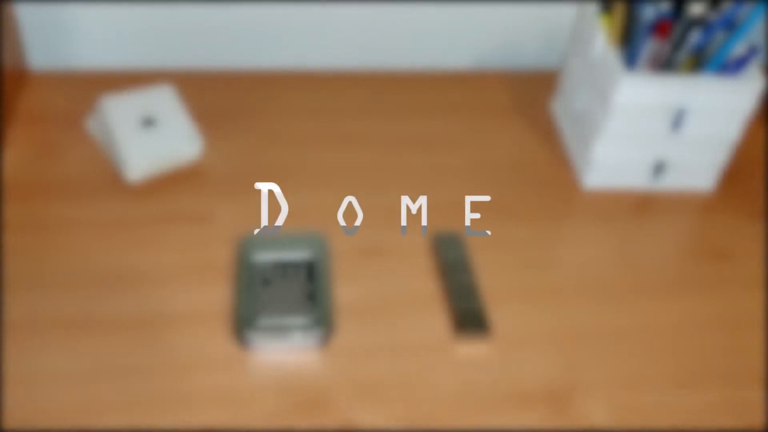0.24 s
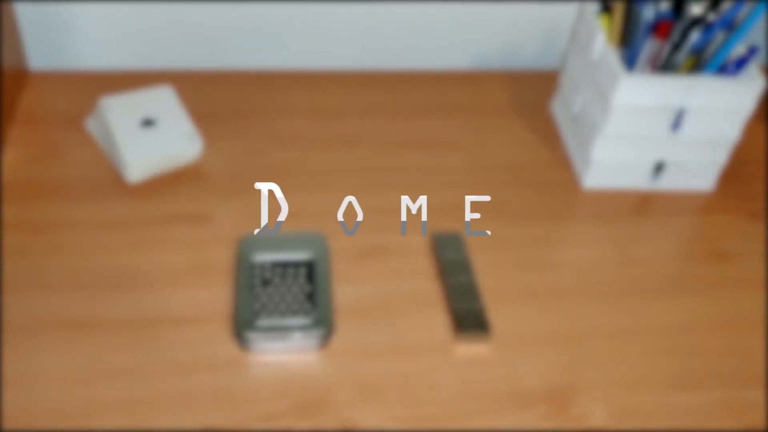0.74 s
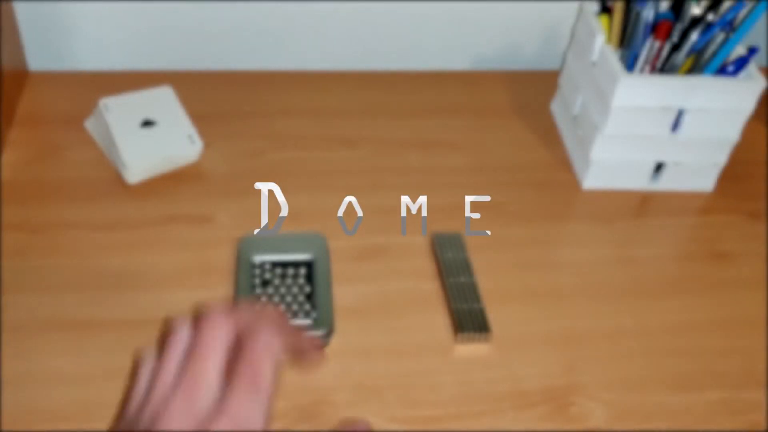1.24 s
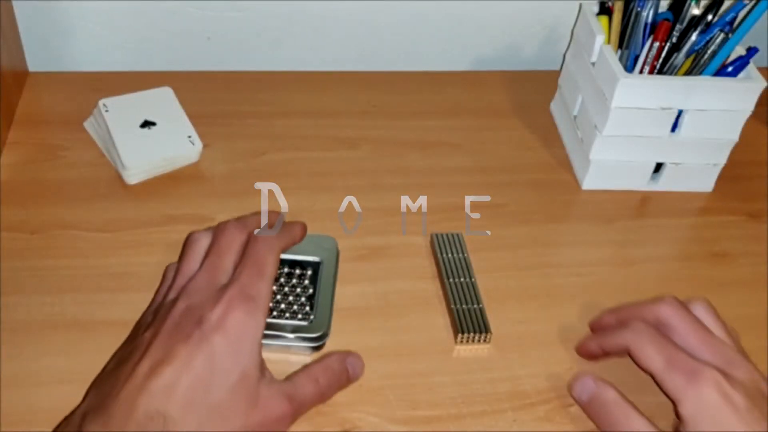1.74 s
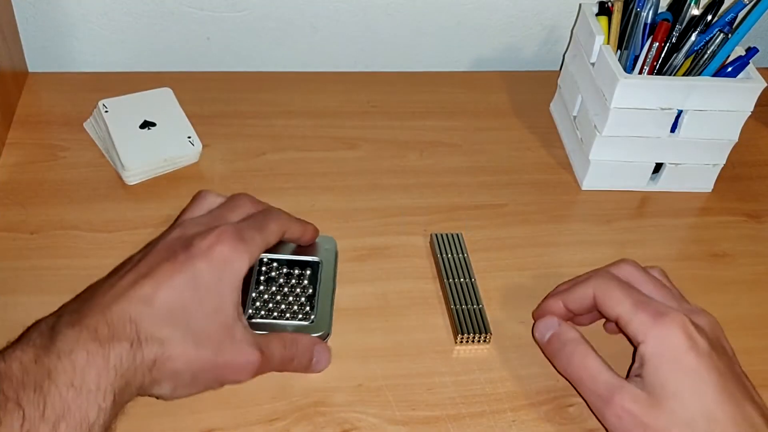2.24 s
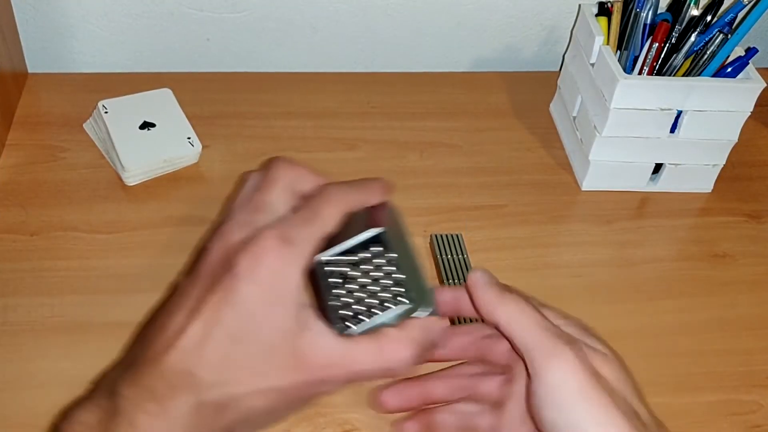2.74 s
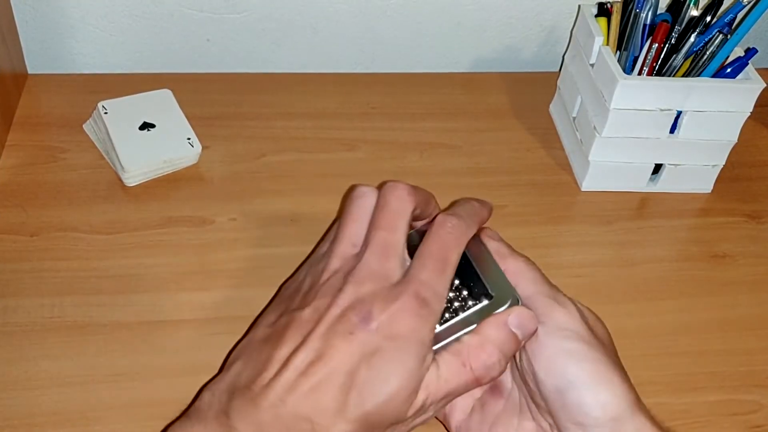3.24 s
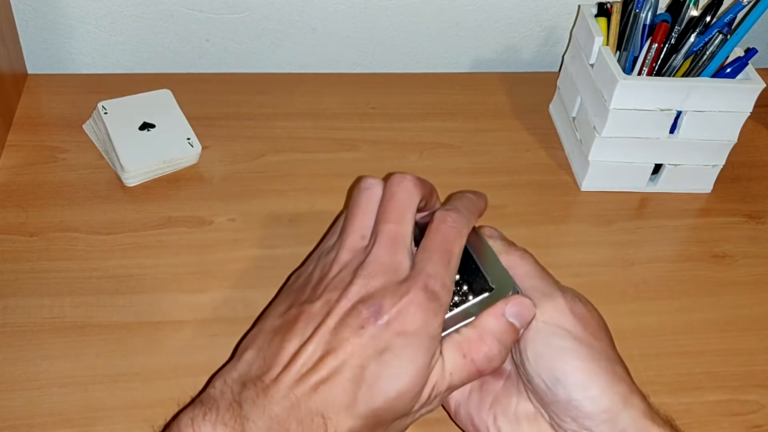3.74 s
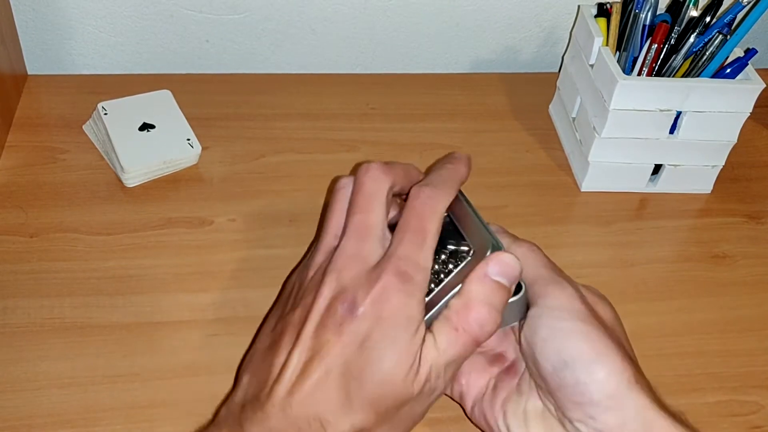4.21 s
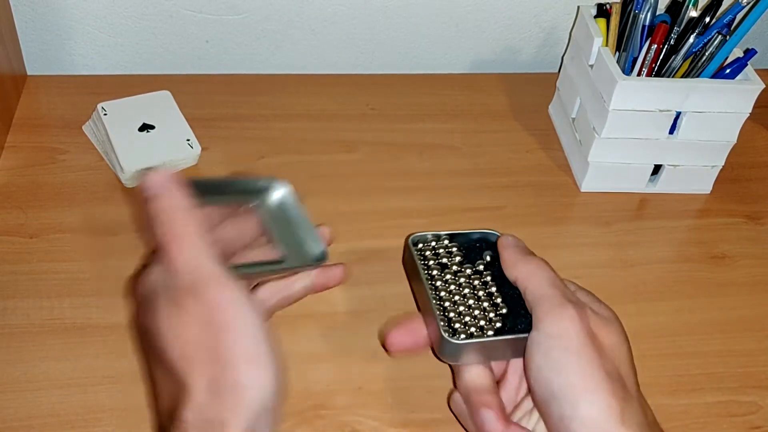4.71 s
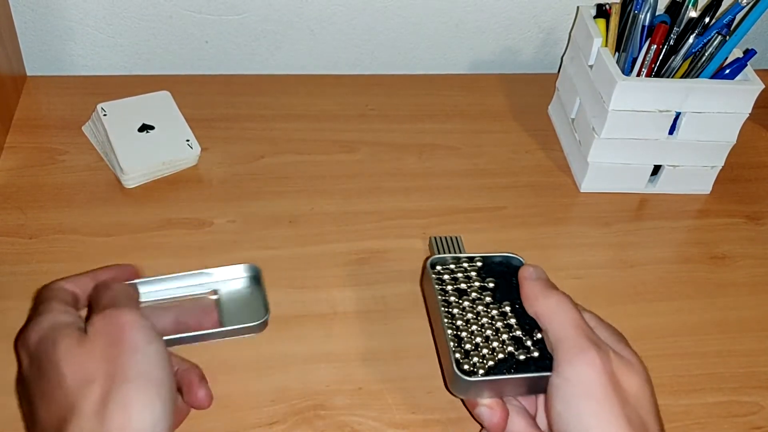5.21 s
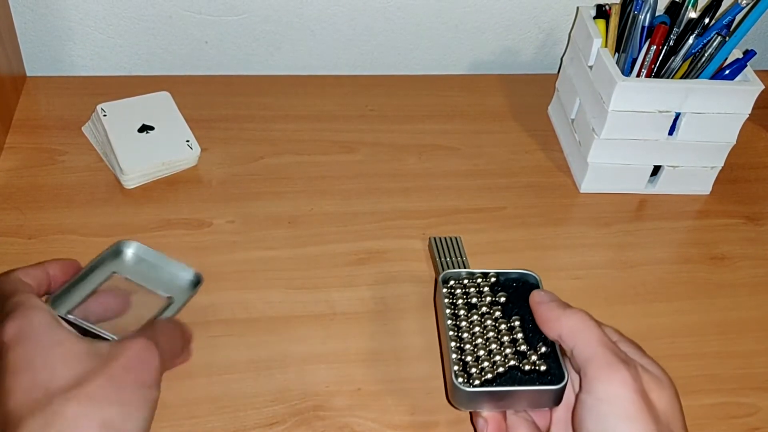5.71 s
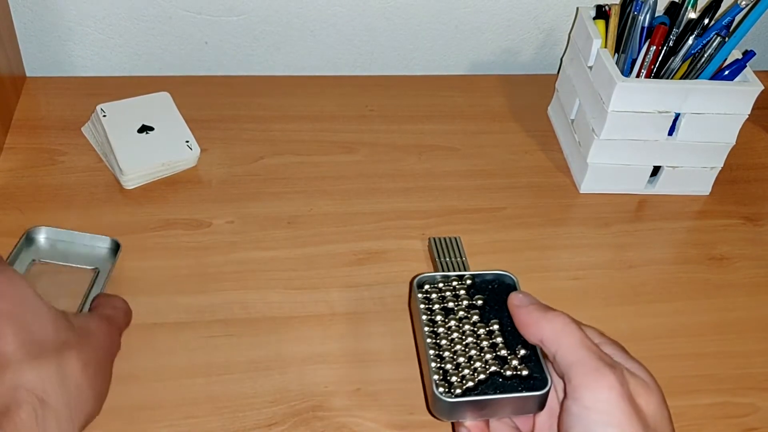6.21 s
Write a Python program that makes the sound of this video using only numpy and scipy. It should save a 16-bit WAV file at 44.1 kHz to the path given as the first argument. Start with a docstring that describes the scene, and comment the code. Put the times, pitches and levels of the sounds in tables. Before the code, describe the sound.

A small tin of steel balls scrapes across a wooden desk, rattles, pops open, then its loose lid clinks and clacks down with a skid.

```python
"""Steel balls in a tin.

A small tin of magnetic steel balls is slid off a wooden desk, lifted and prised open: the balls rattle,
the lid pops, scrapes free, clinks in the hand, is set down with a sharp clack and skids.
Knocks are contacts with dying chatter and rubs are trains of tiny slips, both mostly ringing damped modes;
the pop is one damped swing of air. A small room with a faint low hum, at a close pair of microphone ports."""
import sys
import numpy as np
from scipy import signal
from scipy.io import wavfile
from scipy.ndimage import uniform_filter1d

SR = 44100
rng = np.random.default_rng(int(sys.argv[2]) if len(sys.argv) > 2 else 0)


def put_to_file(sound):
    """Save the sound as 16-bit audio at rate SR, in the file named by the first command-line argument."""
    columns = np.atleast_2d(sound).T  # one column per channel
    safe = np.clip(columns, -1, 1)
    whole_steps = np.round(safe * 32767)
    wavfile.write(sys.argv[1], SR, whole_steps.astype(np.int16))


N = 284886
TIME = np.arange(N) / SR

# Levels of tin, lid and hands are ahead of the ports, those of knocks, drags and skids also ahead of a trim.
# hum tones of the room: f/Hz, level/dB
HUM_TONES = [(49.1, -54.5), (72.0, -61.5), (113.7, -61.5)]
# rises of the lowest hum tone: t/s, level/dB
LOW_HUM_SWELL = [(.5, -4.5), (.8, 0), (4.3, 0), (4.8, 3.5)]
# room rumble, alike at both ports: f/Hz, level/dB
RUMBLE_COLOUR = [(20, -5), (45, 4.5), (90, -11.5), (125, -5), (170, -16), (300, -18.5), (500, -24),
                 (900, -38.5), (2000, -34)]
# each port's own hiss: f/Hz, level/dB
HISS_COLOUR = [(40, 25.5), (100, 22), (200, 9), (500, 7.5), (1000, 5), (2500, 0.5), (6300, 1.5),
               (8000, -1.5), (10000, -29), (12000, -28), (15500, -9)]

# low rustle of the hands and rumble of the desk: f/Hz, level/dB
RUSTLE_COLOUR = [(60, -15.5), (150, -2), (280, 0), (500, -10), (1200, -15.5), (3000, -21), (7000, -30),
                 (10000, -72)]
# low rustle of gripping hands, and the desk's rumble under the dragged tin:
# start t/s, swell t/s, fall t/s, peak level/dB
RUSTLE_SWELLS = [(1.8, 0.1, 0.44, -57), (2.5, 0.1, 0.24, -62.5), (3.58, .35, 0.92, -57.5),
                 (4.62, 0.16, 1, -59.5)]

# the tin ringing against the desk as it slides: f/Hz, width/Hz, level/dB
SLIDING_TIN_MODES = [(537, 99, -2), (924, 134, 1), (1100, 123, 4.5), (1314, 180, -0.5), (1700, 480, -9.5),
                     (2500, 770, -11.5), (3340, 1340, -17), (5700, 1900, -22)]
# pulls of the tin over the desk: start t/s, swell t/s, fall t/s, peak level/dB
DRAGS = [(1.763, 0.059, 0.071, -42), (2.213, 0.014, 0.073, -57.5), (2.368, 0.27, .14, -45.5)]
# the tin's edge bumps on the desk as it is tipped up: t/s, level/dB
BUMPS = [(1.909, -50), (2.699, -35.5), (2.729, -37), (2.807, -37.5)]
# pitch of the scrape as the tin is tipped on its edge: t/s, pitch factor
TIPPING_PITCH = [(0, 0.99), (2.38, 1.14), (2.62, .94), (2.9, 0.91)]

# the bare click of steel on steel: f/Hz, level/dB
CLICK_COLOUR = [(100, -21.5), (350, -29), (650, -36), (1000, -11), (3000, -19.5), (6000, -13.5),
                (8500, -18), (12000, -19), (15500, -2)]
# resonances of the shut tin: f/Hz, width/Hz, level/dB
SHUT_TIN_MODES = [(486, 28, -5.5), (587, 45, -6), (937, 65, 6.5), (1119, 66, 5.5), (1400, 38, -1),
                  (1534, 50.6, -2), (1767, 63, 0), (2630, 240, -7), (3670, 95, -11), (3920, 87, -7),
                  (4820, 63, -13), (6330, 75, -7.5), (6710, 91, -15), (8030, 210, -11)]
# knocks of the balls in the shut tin: t/s, treble level/dB, body level/dB
SHUT_KNOCKS = [(1.917, -31.5, -47.5), (2.598, -36, -41.5), (2.6304, -37, -37.5), (2.659, -33, -41.5),
               (2.7004, -27.5, -34), (2.7294, -30, -35), (2.807, -26.5, -76), (2.9477, -24.5, -28),
               (2.9568, -16.5, -33.5), (2.9928, -14.5, -25.5), (3.0024, -17, -34.5), (3.0228, -21, -32),
               (3.034, -24, -24.5), (3.051, -14.5, -25), (3.0744, -16.5, -30), (3.0885, -25, -23.5),
               (3.1003, -16.5, -38), (3.1257, -22.5, -29.5), (3.1708, -24.5, -41), (3.2056, -26, -56),
               (3.3519, -37.5, -49.5)]
# the balls roll over as the tin is lifted, then settle: start t/s, swell t/s, fall t/s, peak level/dB
SHUFFLES = [(3.025, 0.059, 0.049, -24.5), (3.2, .04, 0.46, -55.5)]

# the puff of air as the lid pops: f/Hz, level/dB
POP_COLOUR = [(40, -30), (90, -18), (145, 1), (200, 0), (270, 3), (370, 0), (470, -4), (620, -13),
              (900, -16.5), (2000, -49)]
# resonances of the rim: f/Hz, width/Hz, level/dB
RIM_MODES = [(435, 174, 9), (726, 31, -12.5), (888, 48, 16.5), (1230, 150, 7.5), (1290, 160, 0),
             (1870, 240, 1), (2950, 350, -21), (4100, 93, -9), (6000, 140, -24), (8200, 350, 3.5)]
# the rim snaps over its catch: t/s, treble level/dB, body level/dB
RIM_KNOCKS = [(3.9808, -14.5, -19), (3.987, -10.5, -24.5), (3.9925, -19, -30)]
# resonances of the opening tin: f/Hz, width/Hz, level/dB
OPEN_TIN_MODES = [(950, 36, -2), (1350, 80, 2), (1650, 130, -6.5), (1960, 120, -2), (2740, 82, -6.5),
                  (3910, 130, -7), (4580, 190, -9.5), (5000, 91, -9.5), (5200, 64, -18), (5430, 90, -8),
                  (6320, 100, -4), (7250, 120, -13), (8050, 174, -8.5), (8980, 130, -10)]
# lid rim and balls against the opening tin: t/s, treble level/dB, body level/dB
OPEN_KNOCKS = [(4.1705, -26.5, -33.5), (4.2572, -24.5, -33.5), (4.309, -34, -60), (4.3261, -30.5, -43),
               (4.355, -26, -40), (4.4217, -23.5, -37), (4.4405, -28, -38.5), (4.4652, -15, -21.5),
               (4.470, -13, -18), (4.485, -17, -38), (4.5055, -16, -27), (4.512, -24, -25),
               (4.5354, -22.5, -37.5), (4.5797, -23, -37), (4.812, -35, -53)]
# fingers and rim rub on the metal: start t/s, swell t/s, fall t/s, peak level/dB
RUBS = [(4.26, .17, .08, -57), (4.466, 0.022, 0.078, -29), (4.7, 0.3, .45, -50), (5.1, 0.14, 0.093, -55),
        (5.31, 0.037, 0.094, -41.5), (5.505, 0.042, .05, -46), (5.76, 0.037, .12, -58)]

# resonances of the loose lid: f/Hz, width/Hz, level/dB
LID_MODES = [(1260, 150, 3.5), (1920, 220, 11), (2366, 46, 5), (2640, 160, 1), (3650, 350, -2.5),
             (4240, 170, 2), (4670, 190, 0), (5200, 180, 0), (6500, 460, -5), (8220, 46, -3.5)]
# clinks of the loose lid in the hand: t/s, treble level/dB, body level/dB
LID_KNOCKS = [(5.0558, -32.5, -37.5), (5.0888, -21.5, -23.5), (5.0978, -30, -33), (5.135, -30, -40),
              (5.2155, -39, -43), (5.2969, -19.5, -27), (5.3743, -34, -54), (5.5038, -32, -44),
              (5.523, -38, -42), (5.5408, -40, -45), (5.562, -35, -43), (5.5787, -42, -48)]
# resonances of the lid on the desk: f/Hz, width/Hz, level/dB
LID_ON_DESK_MODES = [(592, 54, -12), (1400, 110, -8.5), (2104, 83, -6), (2860, 94, -14), (3515, 100, -6),
                     (4130, 75, -6.5), (4580, 24, -6), (5143, 33, -2), (5750, 93, -1), (6170, 85, -4),
                     (6500, 55, -12), (7040, 200, -10), (8190, 47, -6), (8640, 62, -16.5)]
# the lid meets the desk: t/s, treble level/dB, body level/dB
DESK_KNOCKS = [(5.9415, -16, -21.5)]
# the lid skids on the desk and is nudged along: start t/s, swell t/s, fall t/s, peak level/dB
SKIDS = [(5.94, 0.0041, 0.053, -30), (5.96, 0.11, 0.3, -37.5), (6.21, 0.053, 0.12, -45),
         (6.39, .05, .15, -52)]
# broad colour of the skid: f/Hz, level/dB
SKID_COLOUR = [(180, -22), (330, -23), (480, -13), (600, -7), (900, -2.5), (1250, -1), (1880, -4.5),
               (2350, 0.5), (4200, -8), (5730, -19), (8000, -22.5), (10000, -30)]
# the lid ringing as it slides: f/Hz, width/Hz, level/dB
SLIDING_LID_MODES = [(1223, 60, 5.5), (1610, 49, 5), (2275, 83, 5), (2390, 67, -2), (3085, 35, 1),
                     (3520, 45, -1), (4480, 89, -3.5), (5250, 74, -3), (5770, 89, -4.5), (6450, 110, -10)]

# time for the room's tail to die by 60 dB: f/Hz, t/s
ROOM_T60 = [(150, 0.64), (500, 0.58), (1500, 0.36), (4000, 0.5), (7000, 0.43), (10000, 0.28), (15000, 0.17)]
# colour of the left microphone port: f/Hz, level/dB
LEFT_PORT = [(100, -5.5), (4000, -1), (5600, 4), (6450, 9), (7400, 10), (8400, -7), (9300, -18),
             (10200, -12), (12000, -19), (15500, -24)]
# colour of the right microphone port: f/Hz, level/dB
RIGHT_PORT = [(100, -4.5), (4000, -2), (5600, 0), (6450, 2), (7400, 7), (8300, 11), (9300, 1.5),
              (10200, -48), (12000, -12), (15500, -22.5)]

EDGE_HZ = 16000  # top of the band
HANDS_FROM_S, HANDS_TO_S, HANDS_DB = 1.16, 6.2, -66
BUMP_DECAY_S = 0.0058  # a bump's scuff dies quickly
# a harder blow chatters longer: chatter time doubles with every so many dB of body above FIRM_DB
FIRM_DB, CHATTER_DOUBLES_DB = -29, 19
# a rubbing stroke bites quickly, swells to its peak and dies away by FALL_DB in each fall time
BITE_S, FALL_DB = 0.008, 20


def gain_of(db):
    """Turns decibels into gain."""
    return 10 ** (np.asarray(db) / 20)


def evened(x):
    """Scales to unit rms."""
    return x / np.sqrt(np.mean(x ** 2) + 1e-20)


def read(points, hz):
    """Reads a curve on a log-frequency axis."""
    f, value = np.transpose(points)
    return np.interp(np.log(hz + 1), np.log(f + 1), value)


def add(mix, s, sound):
    """Mixes a stereo sound in at time s."""
    part = mix[:, round(s * SR):][:, :sound.shape[1]]
    part += sound[:, :part.shape[1]]


def band(x, hz, kind, order=2):
    """Filters with a Butterworth slope."""
    return signal.sosfilt(signal.butter(order, hz, kind, fs=SR, output="sos"), x)


def causal(points, size=4096):
    """Minimum-phase impulse response of a spectrum."""
    hz = abs(np.fft.fftfreq(size, 1 / SR))
    log_gain = np.log(gain_of(read(points, hz)))
    spectrum = np.exp(np.conj(signal.hilbert(log_gain)))
    return np.fft.ifft(spectrum).real[:size // 2]


def through(x, response):
    """Convolves along time and keeps the length."""
    return signal.fftconvolve(np.atleast_2d(x), np.atleast_2d(response), axes=1)[:, :x.shape[-1]]


def pair(size, apart, shared_hz=700):
    """Noise at two close ports: alike in the bass, partly their own in the treble."""
    middle, other = rng.standard_normal((2, size))
    side = apart * band(other, shared_hz, "high", order=1)
    return np.array([middle + side, middle - side]) / np.hypot(1, apart)


def body(modes, click_db, spread_db=0, size=4096):
    """Damped modes over a bare click; spread_db varies the modes' strengths with the spot struck."""
    t = np.arange(size) / SR
    hz, width, db = np.transpose(modes)[:, :, None]
    sign = (-1) ** np.arange(len(hz))[:, None]
    strength = sign * gain_of(db + spread_db * rng.standard_normal(db.shape))
    onset = strength * 2 * np.pi * width / SR  # a wider mode starts louder, for the same peak in the spectrum
    ring = (onset * np.exp(-np.pi * width * t) * np.cos(2 * np.pi * hz * t)).sum(0)
    click = np.pad(causal(CLICK_COLOUR), (0, size // 2))
    return ring + gain_of(click_db) * click


def all_round(modes, click_db, size=400):
    """Response summed over all directions: modes and click add in power, leaving no notches."""
    f = np.geomspace(50, 16000, size)
    hz, width, db = np.transpose(modes)[:, :, None]
    detuning = (f - hz ** 2 / f) / width
    ring_power = (gain_of(db) ** 2 / (1 + detuning ** 2)).sum(0)
    click_power = gain_of(click_db + read(CLICK_COLOUR, f)) ** 2
    return causal(np.transpose([f, 10 * np.log10(ring_power + click_power)]))


def stroke(start, swell_s, fall_s, peak_db, depth_db):
    """Pressure of one stroke: bites depth_db under its peak, swells, then loses FALL_DB in every fall_s."""
    t, swell_s = np.maximum(TIME - start, 0), max(swell_s, 1e-3)
    rise = depth_db * (t / swell_s - 1)
    fall = FALL_DB * (swell_s - t) / max(fall_s, 1e-3)
    bite = np.minimum(t / min(BITE_S, swell_s), 1)
    return bite * gain_of(peak_db + np.maximum(np.minimum(rise, fall), -200))


def strokes(rows, depth_db):
    """Pressure of a series of strokes, added in power."""
    return np.sqrt(sum(stroke(*row, depth_db) ** 2 for row in rows))


def friction(gain, response, slips_per_s, spread_db, apart, catch_db, catch_hz=45):
    """A train of tiny slips that catch and let go in clumps, coloured by what is rubbed."""
    strength = gain_of(spread_db * np.minimum(rng.exponential(1, N), 4))
    slips = (rng.random(N) < slips_per_s / SR) * strength
    catching = evened(band(rng.standard_normal(N), catch_hz, "low"))
    clumps = gain_of(catch_db * np.tanh(catching))
    return gain * evened(through(slips * clumps * pair(N, apart), response))


def at_peak(x, db, size=128):
    """Scales a knock so that its loudest 3 ms have the given level."""
    return x * gain_of(db) / np.sqrt(uniform_filter1d(x.mean(0) ** 2, size).max())


def knocks(rows, modes, click_db, spread_db, chatter, chatter_s, apart, lead_s,
           room_click_db, split_hz=3200, size=4096):
    """Blows of one contact and a dying chatter of tiny rebounds; gives (direct sound, sound sent to the room)."""
    direct, sent, t = np.zeros((2, N)), np.zeros((2, N)), np.arange(size) / SR
    halves = [signal.butter(4, split_hz, kind, fs=SR, output="sos") for kind in ("low", "high")]
    radiated = all_round(modes, click_db + room_click_db)
    for s, treble_db, body_db in rows:
        decay = chatter_s * 2 ** ((body_db - FIRM_DB) / CHATTER_DOUBLES_DB)
        force = chatter * pair(size, apart) * np.exp(-t / max(decay, 1e-4))
        force[:, 0] += 1  # the first contact
        ring = through(force, body(modes, click_db, spread_db))
        for half, db in zip(halves, (body_db, treble_db)):
            near = at_peak(signal.sosfilt(half, ring), db)
            far = signal.sosfilt(half, [radiated, radiated])
            add(direct, s, near)
            add(sent, s, far * np.linalg.norm(near) / np.linalg.norm(far))  # the room gets the same energy
    direct[1] = np.interp(TIME - lead_s, TIME, direct[1])  # a source on the left reaches the right port later
    return np.array([direct, sent])


def background(rumble_db, hiss_db, waver):
    """Three wavering hum tones, the lowest rising in level, over room rumble and microphone hiss."""
    hum = 0
    low_swell = gain_of(np.interp(TIME, *np.transpose(LOW_HUM_SWELL)))
    for (hz, db), swell in zip(HUM_TONES, (low_swell, 1, 1)):
        drift = 1 + waver * evened(band(rng.standard_normal(N), 6.9, "low"))
        tone = np.sqrt(2) * np.sin(2 * np.pi * (hz * TIME + rng.random()))
        hum = hum + gain_of(db) * swell * drift * tone
    rumble = gain_of(rumble_db) * evened(through(rng.standard_normal(N), causal(RUMBLE_COLOUR)))
    hiss = gain_of(hiss_db) * evened(through(rng.standard_normal((2, N)), causal(HISS_COLOUR)))
    return hum * gain_of([[.5], [-.5]]) + rumble + hiss  # the hum leans 1 dB to the left


def hands_and_desk():
    """Fine slips of skin on the tin while the hands work, swelling with grips and the desk's rumble."""
    busy = uniform_filter1d(1. * (TIME > HANDS_FROM_S) * (TIME < HANDS_TO_S), size=8000)
    pressure = np.hypot(gain_of(HANDS_DB) * busy, strokes(RUSTLE_SWELLS, depth_db=1))
    return friction(pressure, causal(RUSTLE_COLOUR), slips_per_s=2400, spread_db=2.0, apart=0.67, catch_db=0.0)


def dragging():
    """The tin scrapes and bumps over the wood, its ring climbing, then sinking as it tips."""
    scrape = friction(1, body(SLIDING_TIN_MODES, click_db=-22), slips_per_s=2500, spread_db=1.0,
                      apart=0.54, catch_db=0.5)
    place = np.cumsum(np.interp(TIME, *np.transpose(TIPPING_PITCH))) / SR
    pitched = np.array([np.interp(place, TIME, side) for side in scrape])  # read faster or slower
    bumps = sum(gain_of(db) * (TIME > s) * np.exp(-abs(TIME - s) / BUMP_DECAY_S) for s, db in BUMPS)
    pressure = strokes(DRAGS, depth_db=10.5) + bumps
    return gain_of(-1) * pressure * pitched


def rattle():
    """Balls knock inside the shut tin and ring its walls."""
    return gain_of(-1.5) * knocks(SHUT_KNOCKS, SHUT_TIN_MODES, click_db=-1.0, spread_db=2.5, chatter=0.3,
                                  chatter_s=0.0053, apart=0.8, lead_s=0, room_click_db=5.0)


def shuffling():
    """Balls roll over one another in sparse slips that ring the shut tin."""
    return friction(strokes(SHUFFLES, depth_db=9), body(SHUT_TIN_MODES, click_db=-1.5), slips_per_s=390,
                    spread_db=0.0, apart=0.26, catch_db=0.0)


def pop(s, peak_db):
    """The lid lets go and the air in the tin gives one low, quickly damped swing."""
    out, swing = np.zeros((2, N)), causal(POP_COLOUR)
    add(out, s, gain_of(peak_db) * np.array([swing, swing]) / abs(swing).max())
    return out


def rim_snap():
    """The rim snaps over its catch in bright, chattering contacts."""
    return gain_of(-1.0) * knocks(RIM_KNOCKS, RIM_MODES, click_db=10.5, spread_db=2.5, chatter=0.89,
                                  chatter_s=0.0033, apart=0.65, lead_s=0, room_click_db=7.5)


def opening():
    """Lid rim and balls strike the opening tin and ring its modes."""
    return gain_of(-1.5) * knocks(OPEN_KNOCKS, OPEN_TIN_MODES, click_db=-2, spread_db=3.5, chatter=0.38,
                                  chatter_s=0.0039, apart=0.39, lead_s=0, room_click_db=1.0)


def rim_scrape():
    """Fingers and rim rub on the open tin in dense, uneven slips."""
    return friction(strokes(RUBS, depth_db=9), body(OPEN_TIN_MODES, click_db=0), slips_per_s=1500,
                    spread_db=2.5, apart=.5, catch_db=2.5)


def lid_clinks():
    """The loose lid clinks in the hand, with strong chatter on broad modes."""
    return gain_of(-3.5) * knocks(LID_KNOCKS, LID_MODES, click_db=0.5, spread_db=4.0, chatter=1.0,
                                  chatter_s=.003, apart=0.4, lead_s=.00002, room_click_db=-0.5)


def lid_clack():
    """The lid meets the desk in one sharp contact with little chatter."""
    return gain_of(1.0) * knocks(DESK_KNOCKS, LID_ON_DESK_MODES, click_db=-17, spread_db=1.5, chatter=0.084,
                                 chatter_s=0.0021, apart=0.38, lead_s=0.00019, room_click_db=9)


def lid_skid():
    """The lid slides on the desk: a dense broad scrape and sparser slips that ring the lid."""
    slide = strokes(SKIDS, depth_db=3.5)
    scrape = friction(slide * gain_of(-4.0), causal(SKID_COLOUR), slips_per_s=2200, spread_db=-0.5,
                      apart=1.0, catch_db=0.0)
    ring = friction(slide * gain_of(-3), body(SLIDING_LID_MODES, click_db=-21), slips_per_s=460, spread_db=1,
                    apart=1.0, catch_db=-1.5)
    return scrape + ring


def room(x, wet_db, early_db, treble_db, count=8):
    """A few early echoes from desk and wall, and a tail that dies band by band."""
    hz, t, z = signal.stft(pair(SR, apart=0.93, shared_hz=614), SR, nperseg=256)
    fade = gain_of(-60 * t / read(ROOM_T60, hz)[:, None])
    build_up = np.minimum(t / 0.014, 1)
    tilt = gain_of(read([(3000, 0.031), (8000, treble_db)], hz))[:, None]
    tail = signal.istft(z * fade * build_up * tilt, SR, nperseg=256)[1]
    tail *= gain_of(wet_db) / np.linalg.norm(tail[0])
    echo_at = (rng.uniform(.002, .014, count) * SR).astype(int)
    tail[:, echo_at] += gain_of(early_db) * rng.choice([-1, 1], count)
    return through(x, tail)


def scene():
    """Tin, lid, hands and desk in the room, through the two ports, over the background."""
    contacts = rattle() + rim_snap() + opening() + lid_clinks() + lid_clack()
    rubbing = hands_and_desk() + dragging() + shuffling() + rim_scrape() + lid_skid()
    # rubs and pop go alike to the direct sound and to the room
    direct, sent = contacts + rubbing + pop(s=3.9792, peak_db=-13.0)
    left, right = direct + room(sent, wet_db=-8.5, early_db=-19.5, treble_db=0.0)
    ports = np.vstack([through(left, causal(LEFT_PORT)), through(right, causal(RIGHT_PORT))])
    return ports + background(rumble_db=-61, hiss_db=-61, waver=0.068)


def record(dry):
    """Limits the band with a steep low-pass at EDGE_HZ."""
    low_pass = signal.firwin(511, EDGE_HZ, window=("kaiser", 9), fs=SR)
    return signal.oaconvolve(dry, low_pass[None], "same")


dry = scene()
out = record(dry)
put_to_file(out)
```